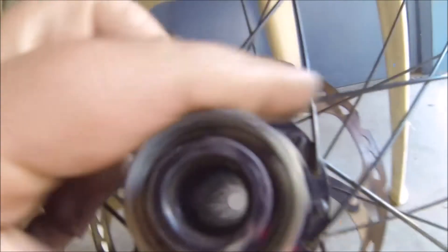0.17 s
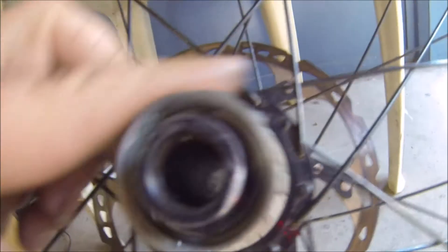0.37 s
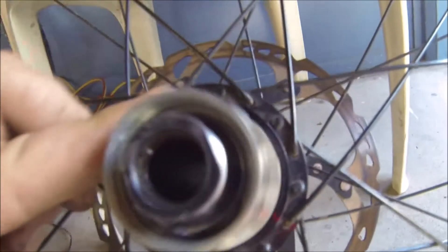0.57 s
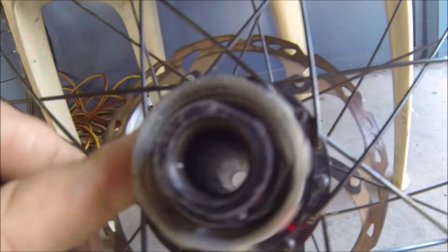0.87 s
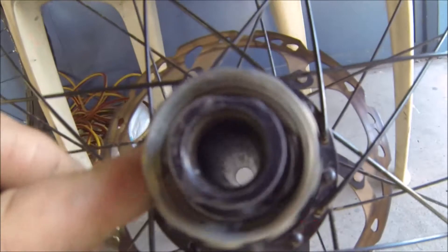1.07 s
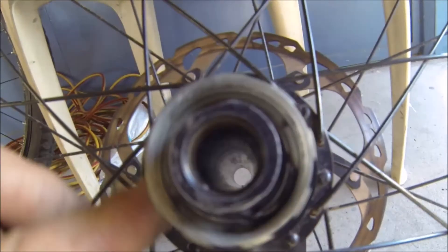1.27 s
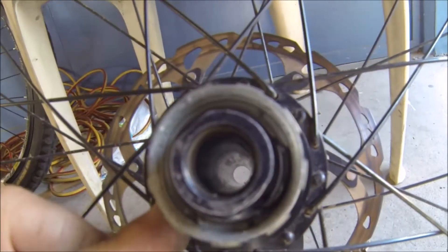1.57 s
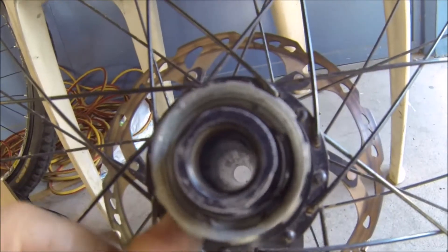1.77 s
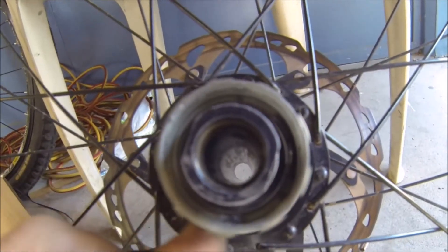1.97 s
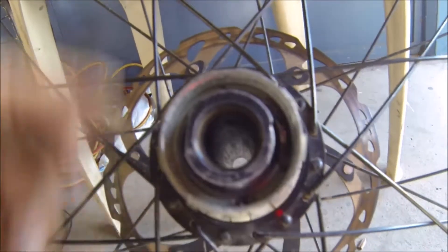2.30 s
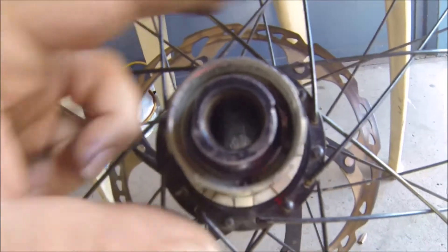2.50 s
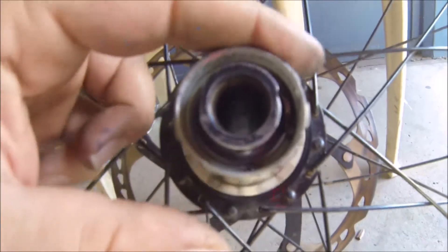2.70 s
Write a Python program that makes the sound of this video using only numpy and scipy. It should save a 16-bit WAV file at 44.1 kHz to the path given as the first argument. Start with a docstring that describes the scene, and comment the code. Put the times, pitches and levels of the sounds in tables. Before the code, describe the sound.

Bicycle freehub clicking close up, turned by hand, fast then slower, pausing, over a deep hum

```python
"""A worn bicycle freehub clicks close by, turned by hand: quickly, then slower, a pause, and on again.
At each tooth one to three pawl strikes fall, mostly a few milliseconds apart: filtered noise makes the crack
and snap, dying sines the ring of pawl and hub. Shaped noise gives the rubbing fingers, a faintly singing pawl
and the air; wavering sines give the machine hum of the workshop, and a tail of dying noise its reverberation."""
import sys
import numpy as np
from scipy import signal
from scipy.fft import rfft, irfft
from scipy.io import wavfile

SR = 44100
rng = np.random.default_rng(int(sys.argv[2]) if len(sys.argv) > 2 else 0)


def bounce(signal):
    """Save signal as a 16-bit WAV file at the path given by the first command-line argument."""
    frames = np.transpose(np.atleast_2d(signal))
    limited = np.clip(frames, -1, 1)
    pcm = np.round(limited * 32767).astype(np.int16)
    wavfile.write(sys.argv[1], SR, pcm)


N = 125685
LEAD_IN_S = 0.1   # clicks are computed from this long before the scene opens


def from_db(db):
    """Decibels to gain."""
    return 10 ** (np.asarray(db) / 20)


def rms_one(x):
    """Scale to rms 1."""
    return x / np.sqrt(np.mean(x ** 2) + 1e-20)


def at_hz(table, hz, axis=1):
    """Read one column of a table on a log-frequency axis."""
    table = np.array(table)
    return np.interp(np.log(np.maximum(hz, 1)), np.log(table[:, 0]), table[:, axis])


def at_time(table, s):
    """Read all columns of a curve at one moment."""
    times, *columns = np.transpose(table)
    return [np.interp(s, times, column) for column in columns]


def in_time(rows):
    """Join (s, value) points by straight lines over the scene."""
    return np.interp(np.arange(N) / SR, *np.transpose(rows))


def drift(count):
    """Slow random curve through this many points over the scene; their spread is about 1."""
    return np.interp(np.linspace(0, count - 1, N), np.arange(count), rng.standard_normal(count))


def fade(t, t60):
    """Exponential decay by 60 dB in t60 seconds."""
    return np.exp(-np.log(1000) * t / t60)


def ring(t, hz, t60):
    """One dying partial of random phase, from t = 0 on."""
    return np.sin(2 * np.pi * (hz * t + rng.random())) * fade(np.maximum(t, 0), t60) * (t >= 0)


def tone(hz, db):
    """A sine that follows a pitch curve, at the given rms level."""
    return np.sqrt(2) * from_db(db) * np.sin(2 * np.pi * (np.cumsum(hz) / SR + rng.random()))


def noise(color):
    """Steady noise of the given colour, rms 1."""
    gains = from_db(at_hz(color, np.fft.rfftfreq(N, 1 / SR)))
    return rms_one(irfft(rfft(rng.standard_normal(N)) * gains, N))


def dying_noise(table, white):
    """Noise split into narrow bands, each with its own level and decay time; starts at about rms 1."""
    size = len(white)
    t, hz = np.arange(size) / SR, np.fft.rfftfreq(size, 1 / SR)
    spectrum = rfft(white) * rms_one(from_db(at_hz(table, hz)))
    edges = np.geomspace(300, 18000, 15)
    out = np.zeros(size)
    for low, high in zip(edges, edges[1:]):
        band = irfft(spectrum * (hz >= low) * (hz < high), size)
        t60 = at_hz(table, np.sqrt(low * high), axis=2)
        out += band * from_db(-60 * t / t60)
    return out


# Quickly damped resonances that crowd the metal.
# Each row: frequency in Hz, relative level in dB per Hz, t60 in seconds.
CRACK_COLOR = [(400, -16, 0.043), (956, -16, 0.022), (2170, -6.5, 0.09), (4200, -12.5, 0.053),
               (6000, -7.5, 0.037), (8130, -4, 0.044), (12200, 2.5, 0.02), (13200, -4.5, 0.02),
               (14240, 4.5, .02), (15700, -20, 0.0088)]
CRACK_DB = -3.5
CRACK_FRESH = 0.75   # share of the crack's power that differs from drop to drop


def crack(metal):
    """The dense crack: noise common to all drops mixed with fresh noise, each band dying at its own rate."""
    own = rng.standard_normal(len(metal))
    mixed = np.sqrt(1 - CRACK_FRESH) * metal + np.sqrt(CRACK_FRESH) * own
    return from_db(CRACK_DB) * dying_noise(CRACK_COLOR, mixed)


SNAP_DB, SNAP_T60_S, SNAP_LOW_HZ = -4, 0.0016, 8350


def snap(t, hard_db):
    """The bright contact: a very short noise burst through a high-pass."""
    bright = signal.butter(2, SNAP_LOW_HZ, "high", fs=SR, output="sos")
    contact = rng.standard_normal(len(t)) * fade(t, SNAP_T60_S)
    return from_db(SNAP_DB + hard_db) * signal.sosfilt(bright, contact)


HUB_RISE_S = 0.00068   # time constant: the heavy parts take a moment to swing up


def swing_up(t):
    """The heavy parts build up their motion instead of starting at once."""
    return 1 - np.exp(-t / HUB_RISE_S)


# Resonances of pawls and hub.
# Each row: frequency in Hz, relative level in dB, t60 in seconds.
HUB_MODES = [(1020, -27, .03), (1460, -26, .035), (2110, -26, .035), (2385, -28, .1), (3290, -14, .02),
             (6200, -16, .03), (8270, -16, .04), (11150, -15, .04), (13700, -13, .012), (1728, -38, .1),
             (2492, -23.5, .11), (2584, -25, .15), (3478, -10, .026), (4545, -29, .07), (5249, -33, .21),
             (7140, -29, .15), (7208, -27, .13), (8861, -25, .07), (9157, -23, .1), (9320, -28, .2),
             (9631, -17, .085)]
# Level change of the sleeve's resonances as the finger presses and drives it.
# Each row: time in seconds, change in dB.
SLEEVE_CURVE = [(.25, -1), (.28, -3), (.44, 5), (.49, -5.5), (.67, -3.5), (.75, 1.5)]
MODES_DB, MODE_SCATTER_DB = -1, 2.5
SEATING_DETUNE = 0.000327   # relative pitch spread times t60 (s): short modes shift most
SLEEVE_ABOVE_HZ, HUB_BELOW_HZ, PAWL_ABOVE_HZ = 3000, 4000, 10000


def hub_modes(t, s, hub_db, hard_db):
    """Dying sines for hub and pawl; each strike scatters their levels and, with the seating, their pitches."""
    hz, mode_db, t60 = np.transpose(HUB_MODES)
    strength, seating = rng.standard_normal((2, len(hz)))
    heavy = hz < HUB_BELOW_HZ
    sleeve = heavy & (hz > SLEEVE_ABOVE_HZ)
    sleeve_db, = at_time(SLEEVE_CURVE, s)
    level_db = MODES_DB + mode_db + MODE_SCATTER_DB * strength
    level_db += hub_db * heavy + sleeve_db * sleeve + hard_db * (hz > PAWL_ABOVE_HZ)
    # the detuning shrinks with frequency above the hub's range
    pitches = hz * (1 + SEATING_DETUNE * seating / t60 * np.minimum(1, HUB_BELOW_HZ / hz))
    decays = fade(t, t60[:, None]) * np.where(heavy[:, None], swing_up(t), 1)
    signs = (-1) ** np.arange(len(hz))   # neighbouring rows start in opposite directions
    return (from_db(level_db) * signs) @ (np.sin(2 * np.pi * pitches[:, None] * t) * decays)


# The loose body's knock, shifting as it turns under the finger.
# Each row: time in seconds, pitch in Hz, relative level in dB.
KNOCK_CURVE = [(.22, 2470, -13.5), (.248, 2120, -8.5), (.28, 2200, -13), (.31, 1915, -2), (.345, 2580, -14),
               (.395, 2060, -5), (.485, 2440, -8), (.515, 2280, -9), (.541, 2010, -13), (.566, 2250, -8),
               (.72, 2180, -12.5), (.91, 2260, -4), (.977, 2280, -33), (1.055, 2244, -8),
               (1.25, 2296, -6.5), (1.34, 2173, -10.5), (1.97, 2247, -5), (2.06, 2055, -8),
               (2.11, 2300, -7.5), (2.8, 2300, -9)]


def knock(t, s, hub_db):
    """The loose body answers with one low partial that swings up, then dies."""
    hz, db = at_time(KNOCK_CURVE, s)
    return from_db(db + hub_db) * swing_up(t) * ring(t, hz, t60=0.024)


# The pawl's own ping, which depends on how it is seated.
# Each row: time in seconds, central pitch in Hz, relative level in dB.
PING_CURVE = [(.22, 10770, -4.5), (.345, 10600, -4), (.395, 10600, 0.5), (.565, 10620, 2.5),
              (.6, 10630, 2.5), (.72, 10940, 3), (.98, 10750, 2), (1.2, 11180, -6), (1.45, 10700, 1),
              (1.9, 10740, 2), (2.06, 10920, -1.5)]
PING_SCATTER_HZ = 40   # spread of pitch from drop to drop
PING_TRADE = 0.24      # dB of ping lost for each dB that goes into the hub


def ping(t, s, hub_db, hard_db):
    """The small pawl rings as one high partial, weaker when more of the blow goes into the hub."""
    hz, db = at_time(PING_CURVE, s)
    hz = hz + PING_SCATTER_HZ * rng.standard_normal()
    return from_db(db + hard_db - PING_TRADE * hub_db) * ring(t, hz, t60=0.024)


# Pawls dropping behind the teeth.
# Each row: start in seconds, strength in dB, extra level of the low hub resonances in dB.
PAWL_DROPS = [(-0.02, -16.5, -1.5), (0.2145, -35, 3), (0.2181, -19.5, -0.5), (0.245, -23.5, 8),
              (0.246, -21, -0.5), (0.2734, -30, -5), (0.2762, -20.5, -6), (0.307, -19.5, -0.5),
              (0.3428, -26, 4.5), (0.3459, -21.5, -5), (0.3931, -17.5, -3), (0.4337, -35, 0),
              (0.4365, -23.5, 0), (0.4387, -22, -3.5), (0.454, -47, -9), (0.4697, -41, -10),
              (0.4818, -30, 0), (0.4836, -19.5, -4), (0.508, -44, -4), (0.5128, -21.5, 3.5),
              (0.515, -24.5, 1), (0.538, -28, -8), (0.5402, -23.5, -1), (0.5415, -28, -7),
              (0.5624, -33, -10), (0.5655, -25.5, 8), (0.5673, -25, 0.5), (0.593, -29, -9),
              (0.5951, -20.5, -0.5), (0.6272, -35, -13), (0.6298, -23.5, 3), (0.6316, -24, -4),
              (0.6696, -24, 2), (0.673, -22.5, 2.5), (0.7181, -38, 6), (0.7215, -20.5, 2.5),
              (0.7806, -24, -8), (0.7854, -21.5, 1), (0.8381, -34, 11), (0.8418, -20, 0.5),
              (0.9075, -23.5, 1), (0.9119, -21, -1.5), (0.9734, -38.5, 13.5), (0.9772, -19.5, -2),
              (1.055, -21.5, -1.5), (1.0611, -24, 4), (1.1225, -35, 0), (1.128, -23, 1),
              (1.1293, -23.5, -2), (1.1686, -23, -14), (1.1721, -23.5, 5), (1.2108, -26.5, 0),
              (1.2143, -29, -18), (1.2164, -20.5, -1.5), (1.2714, -21.5, -4), (1.2748, -24, 4),
              (1.33, -35, 6), (1.3373, -24.5, 3), (1.3428, -23, 2), (1.4527, -23, 1.5),
              (1.4595, -25.5, 1.5), (1.5675, -35.5, 4), (1.5773, -24, 3.5), (1.5873, -25, -2),
              (1.7169, -22.5, -4), (1.7228, -25.5, 2.5), (1.803, -36, -2), (1.812, -23.5, 1.5),
              (1.8225, -25, 1.5), (1.8946, -24, 1.5), (1.8977, -22.5, -2.5), (1.9692, -35, 0),
              (1.9754, -23, 0), (1.9815, -24, -3), (2.0542, -21.0, -5), (2.0571, -26, 6),
              (2.1046, -34.0, -2), (2.1095, -23, 0), (2.1159, -24, -6), (2.7813, -20.5, 1.5),
              (2.8197, -30, -7), (2.822, -25, 2.5), (2.8249, -27.5, 5)]
# harder drops are brighter: snap, ping and pawl modes gain this many dB per dB above a usual drop
SNAP_GROWTH, USUAL_DROP_DB = 0.25, -19.5
RING_S, CRACK_S = 0.3, 0.05   # computed lengths


def pawls():
    """Every drop is a crack, a snap, hub modes, a knock and a ping, each struck a little differently."""
    size, short = int(RING_S * SR), int(CRACK_S * SR)
    length = N + int(LEAD_IN_S * SR)
    t, out = np.arange(size) / SR, np.zeros(length + size)
    metal = rng.standard_normal(short)
    for s, db, hub_db in PAWL_DROPS:
        hard_db = SNAP_GROWTH * (db - USUAL_DROP_DB)
        drop = hub_modes(t, s, hub_db, hard_db)
        drop += knock(t, s, hub_db)
        drop += ping(t, s, hub_db, hard_db)
        drop[:short] += crack(metal) + snap(t[:short], hard_db)
        start = int((s + LEAD_IN_S) * SR)
        out[start:start + size] += from_db(db) * drop
    return out[:length]


# The workshop's reverberation.
# Each row: frequency in Hz, relative level in dB per Hz, t60 in seconds.
ROOM_COLOR = [(507, 0, 0.159), (1560, 7.5, 0.42), (2500, 5, 0.25), (8700, 0, 0.21), (11000, -2, 0.16),
              (15000, -2, 0.16)]
ROOM_DB, ROOM_DELAY_S = -12.5, 0.005


def workshop(x):
    """A short diffuse tail, duller as it dies."""
    tail = dying_noise(ROOM_COLOR, rng.standard_normal(SR // 2))
    tail = tail / np.sqrt(np.sum(tail ** 2))   # unit energy
    tail = np.r_[np.zeros(int(ROOM_DELAY_S * SR)), tail]
    return from_db(ROOM_DB) * signal.fftconvolve(x, tail)[:len(x)]


# Pitch of the deep hum. Each row: time in seconds, frequency in Hz.
HUM_PITCH = [(0.0, 42.66), (2.85, 42.49)]
# Its loudness. Each row: time in seconds, rms level in dB.
HUM_LOUDNESS = [(0, -31.5), (.55, -33.5), (.85, -38.5), (1.3, -35.5), (1.7, -36), (2.3, -35), (2.85, -34)]
# The motor's strongest overtone swells and fades. Each row: time in seconds, rms level in dB.
DRONE_LOUDNESS = [(0, -52.5), (.5, -58.5), (.95, -59.5), (1.15, -46), (1.4, -51.5), (1.7, -57), (2.15, -51),
                  (2.5, -61), (2.85, -61)]
# Fainter overtones of the motors. Each row: central frequency in Hz, central level in dB.
MOTOR_LINES = [(85, -54.5), (138.5, -58), (232, -65), (278, -67.5)]
DRONE_HZ, MOTOR_WAVER_HZ, MOTOR_WAVER_DB = 207.5, 0.69, 2


def hum():
    """One deep machine tone under a swelling overtone and a few faint wavering motor lines."""
    out = tone(in_time(HUM_PITCH), in_time(HUM_LOUDNESS))
    out += tone(DRONE_HZ + MOTOR_WAVER_HZ * drift(count=12), in_time(DRONE_LOUDNESS))
    for line_hz, line_db in MOTOR_LINES:
        pitch = line_hz + MOTOR_WAVER_HZ * drift(count=12)
        out += tone(pitch, line_db + MOTOR_WAVER_DB * drift(count=9))
    return out


# Background noise of the workshop. Each row: frequency in Hz, relative level in dB per Hz.
AIR_COLOR = [(15, -23), (30, 4), (55, 4.5), (85, -1.5), (120, -12), (190, -8.5), (250, -13.5), (330, -22.5),
             (550, -27.5), (1000, -31.5), (2500, -40.5), (5000, -50.5), (10000, -55), (15000, -57.5)]
AIR_DB = -40


def air():
    """Steady noise, weighted to the bass."""
    return from_db(AIR_DB) * noise(AIR_COLOR)


# Fingers brush the freehub as they take a new grip. Each row: time in seconds, level in dB.
GRIP_CURVE = [(0, -78), (.1, -60), (.2, -66), (.35, -67), (2.48, -75.5), (2.62, -64.5), (2.69, -59),
              (2.78, -59.5), (2.85, -71)]
# Skin on the metal. Each row: frequency in Hz, relative level in dB per Hz.
SKIN_COLOR = [(300, -11), (620, 11.5), (1000, -13.5), (1700, -4), (2600, 0.5), (3500, 0.5), (4200, -10),
              (7000, -18), (10700, -24.5), (15000, -21)]
# Faint dry scrapes of a finger on the rim. Each row: centre in seconds, peak level in dB.
SCRAPE_TIMES = [(.17, -61), (2.494, -65.5), (2.556, -60.5)]
# Their colour. Each row: frequency in Hz, relative level in dB per Hz.
SCRAPE_COLOR = [(4500, -30), (6500, 4), (8500, -5), (12000, -7), (15000, -22)]
RUB_FLUTTER_DB = 2
SCRAPE_HALF_S = 0.0023   # from the peak to 1/e


def fingers():
    """Soft, uneven rubbing noise while the hand shifts, and a few small scrapes of brighter noise."""
    t = np.arange(N) / SR
    rub_db = in_time(GRIP_CURVE) + RUB_FLUTTER_DB * drift(count=120)
    rub = from_db(rub_db) * noise(SKIN_COLOR)
    strokes = sum(from_db(db) * np.exp(-((t - s) / SCRAPE_HALF_S) ** 2) for s, db in SCRAPE_TIMES)
    return rub + strokes * noise(SCRAPE_COLOR)


# Where the creeping pawl sings: lower and upper band edge in Hz.
CREEP_BAND = [10500, 10850]
CREEP_AT_S, CREEP_HALF_S, CREEP_DB = 0.115, 0.061, -62.5   # centre, time from peak to 1/e, peak level


def creep():
    """A pawl creeps up a tooth and friction keeps it singing: narrow-band noise that swells and fades."""
    band = signal.butter(1, CREEP_BAND, "band", fs=SR, output="sos")
    song = rms_one(signal.sosfilt(band, rng.standard_normal(N)))
    swell = np.exp(-((np.arange(N) / SR - CREEP_AT_S) / CREEP_HALF_S) ** 2)
    return from_db(CREEP_DB) * swell * song


# The worn body tips and bumps against its bearing. Each row: start in seconds, strength in dB.
BUMP_TIMES = [(0.5402, -19.5), (2.7794, -22.5)]
# What a bump rings with. Each row: frequency in Hz, relative level in dB, t60 in seconds.
BUMP_RINGS = [(1450, -13, 0.018), (3020, -10.5, 0.0117), (4960, -5, 0.015)]


def bumps():
    """Play in the bearing gives short knocks of a few quickly dying partials."""
    t = np.arange(-int(LEAD_IN_S * SR), N) / SR
    out = np.zeros(len(t))
    for s, db in BUMP_TIMES:
        for hz, mode_db, t60 in BUMP_RINGS:
            out += from_db(db + mode_db) * ring(t - s, hz, t60)
    return out


def scene():
    """The freehub, already turning, in the humming workshop."""
    clicks = pawls() + bumps()
    hub = (clicks + workshop(clicks))[-N:]   # drop the lead-in
    return (hub + hum() + air() + fingers() + creep())[None]


def record(dry):
    """The top is cut steeply: 60 dB down from 16500 Hz up."""
    return signal.sosfilt(signal.cheby2(12, 60, 16500, fs=SR, output="sos"), dry)


dry = scene()
out = record(dry)
bounce(out)
```